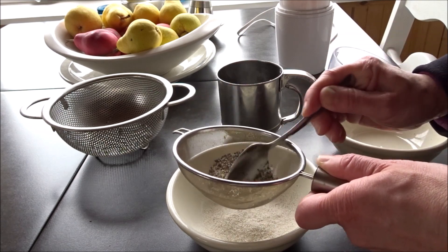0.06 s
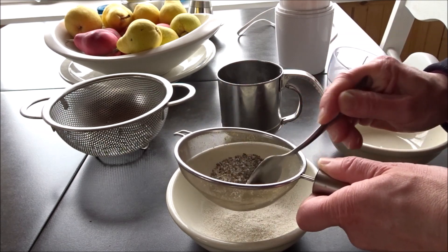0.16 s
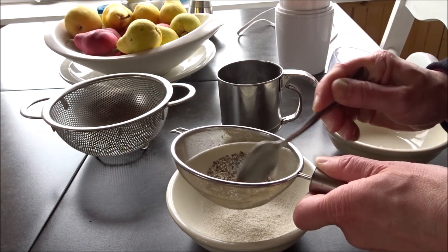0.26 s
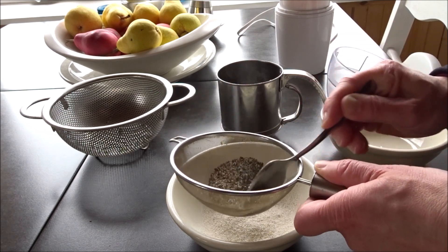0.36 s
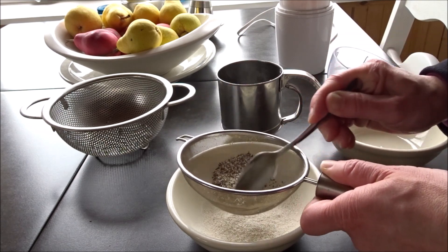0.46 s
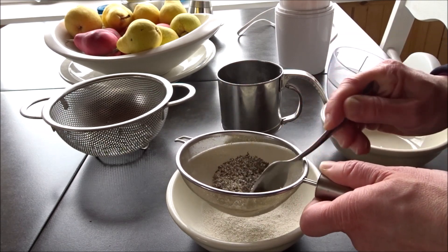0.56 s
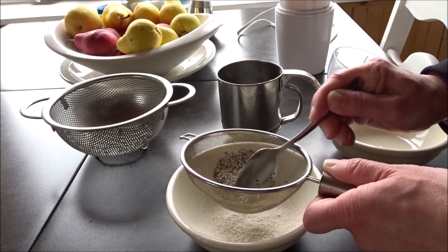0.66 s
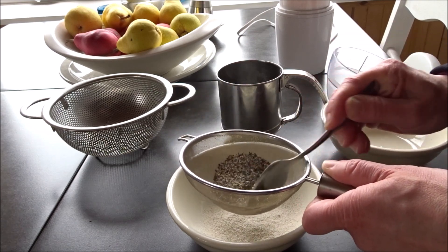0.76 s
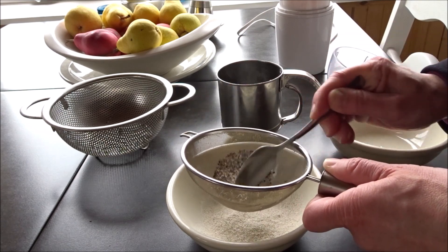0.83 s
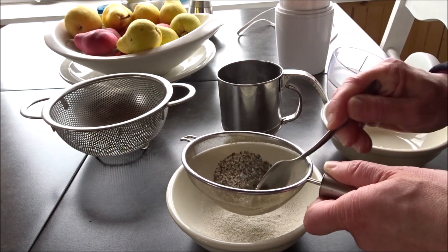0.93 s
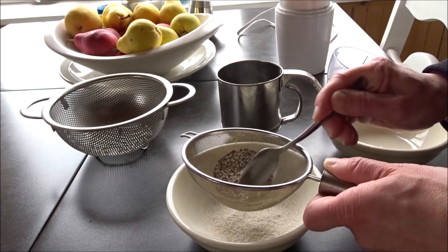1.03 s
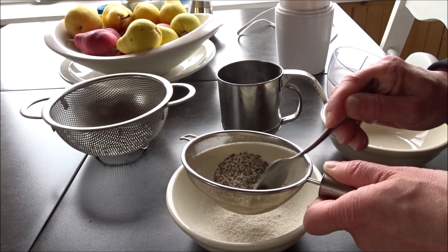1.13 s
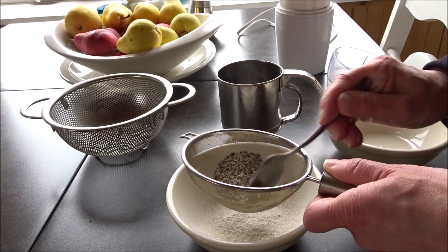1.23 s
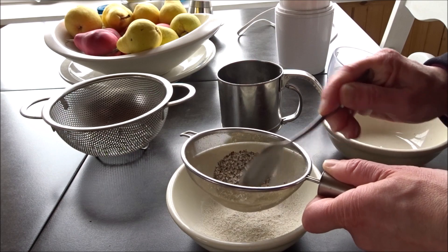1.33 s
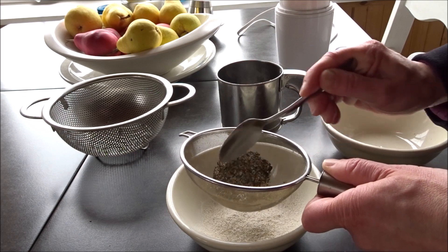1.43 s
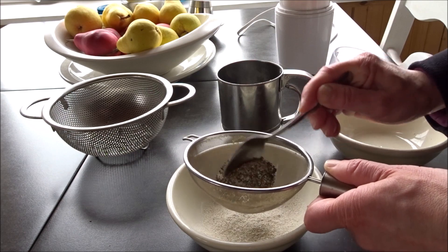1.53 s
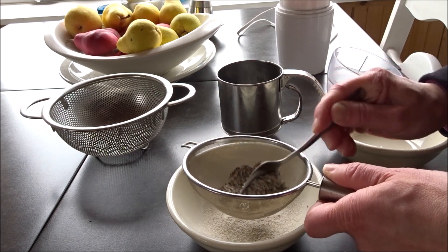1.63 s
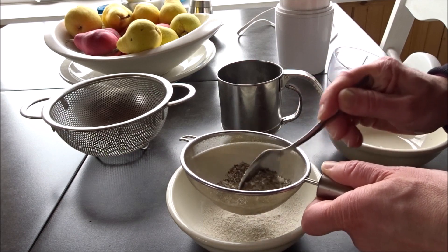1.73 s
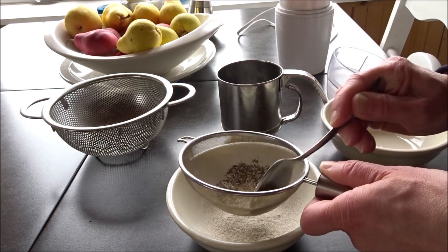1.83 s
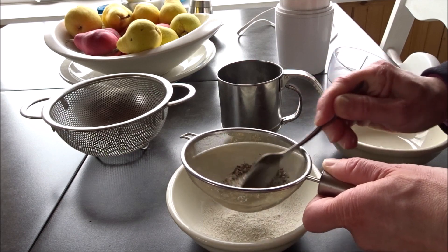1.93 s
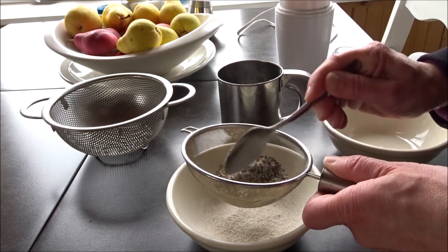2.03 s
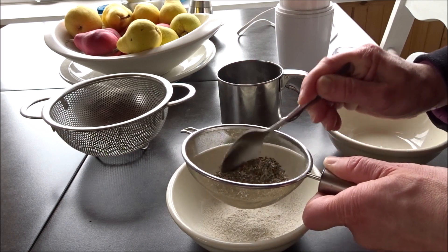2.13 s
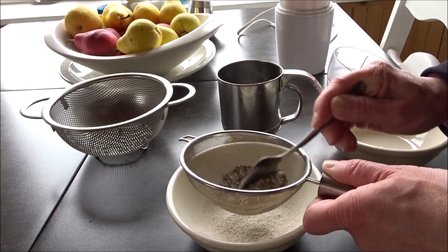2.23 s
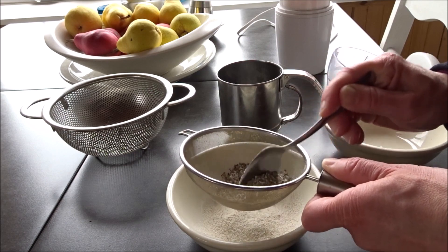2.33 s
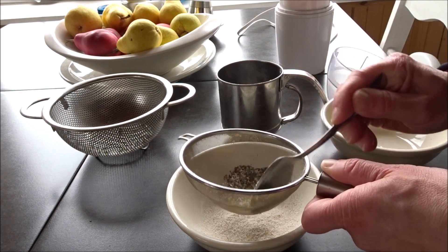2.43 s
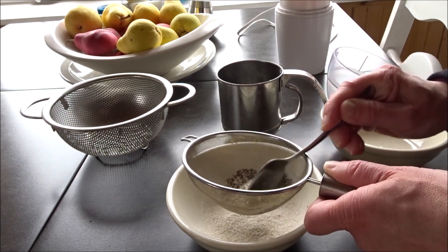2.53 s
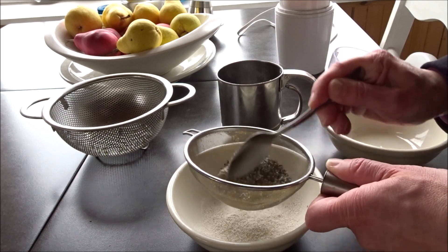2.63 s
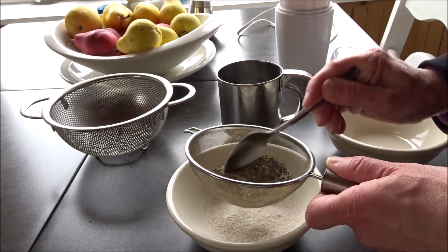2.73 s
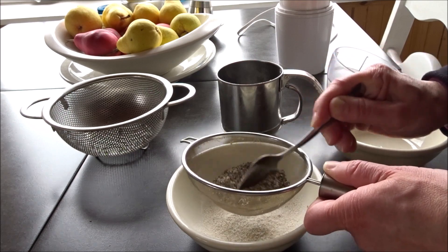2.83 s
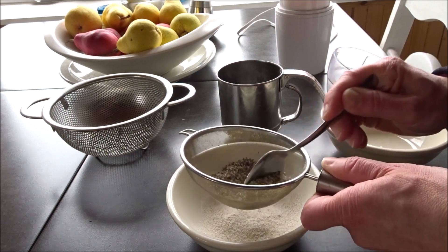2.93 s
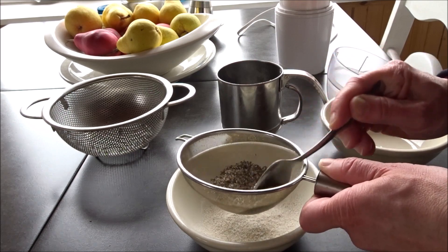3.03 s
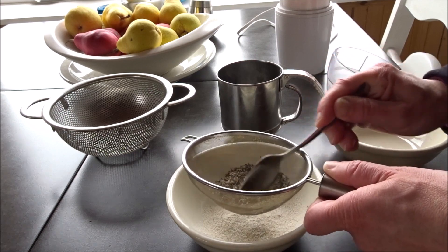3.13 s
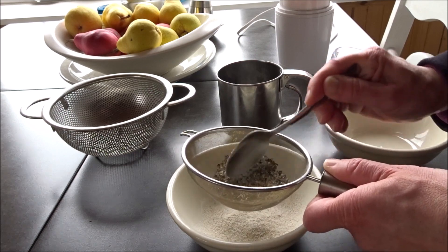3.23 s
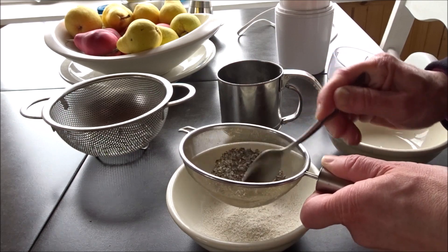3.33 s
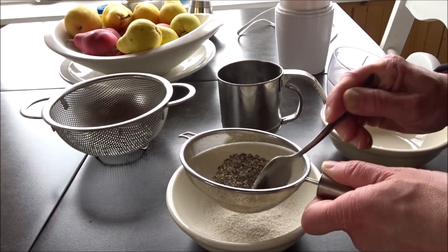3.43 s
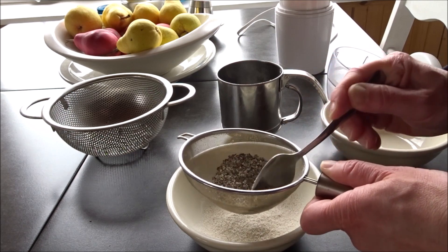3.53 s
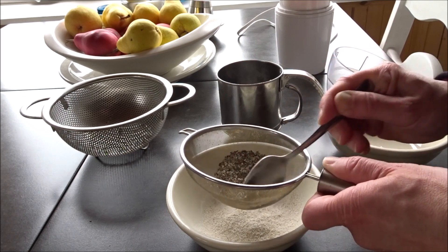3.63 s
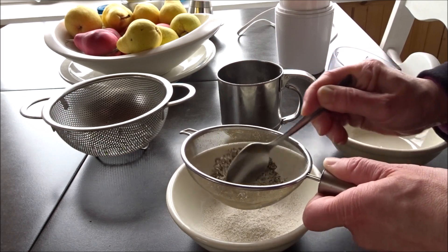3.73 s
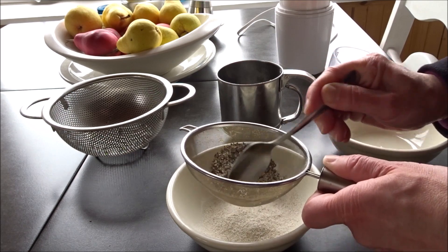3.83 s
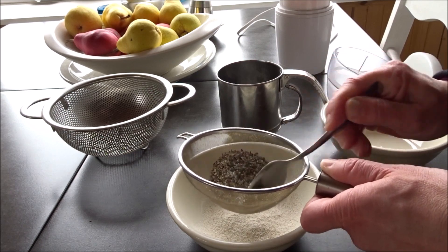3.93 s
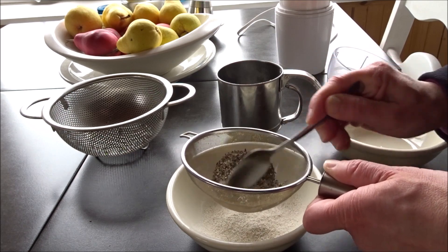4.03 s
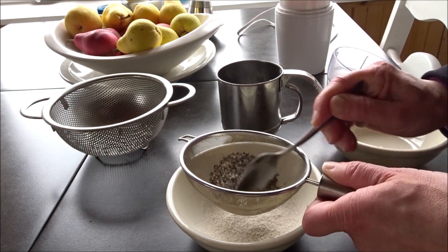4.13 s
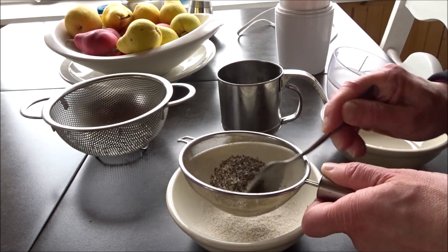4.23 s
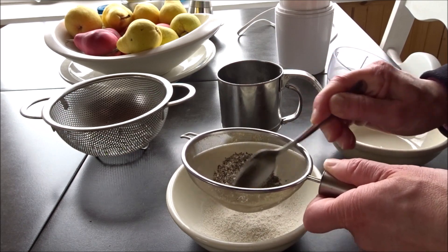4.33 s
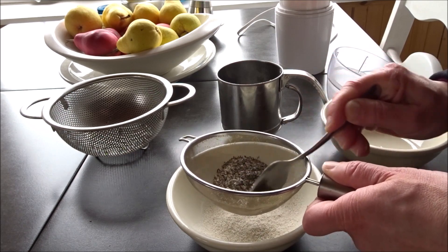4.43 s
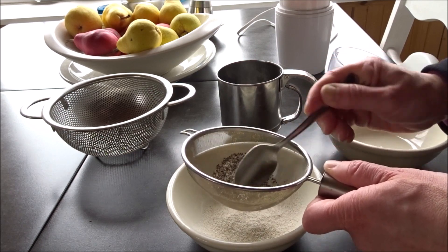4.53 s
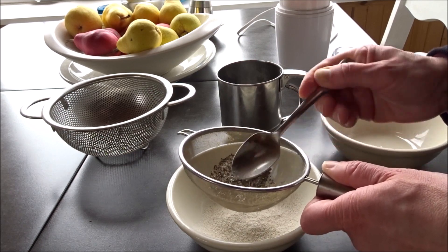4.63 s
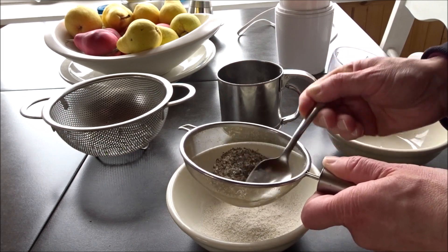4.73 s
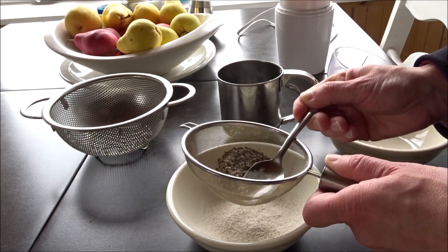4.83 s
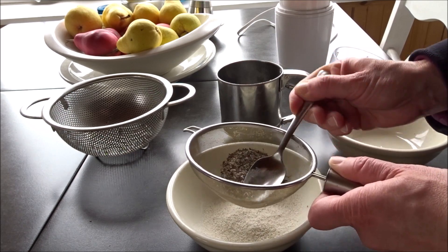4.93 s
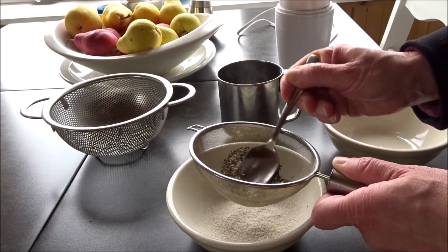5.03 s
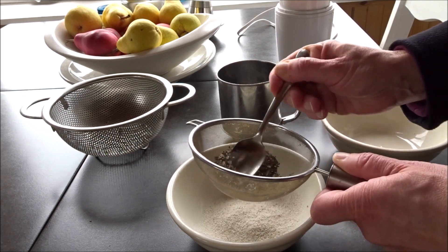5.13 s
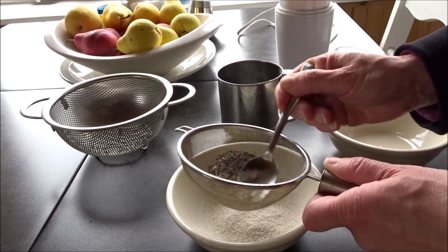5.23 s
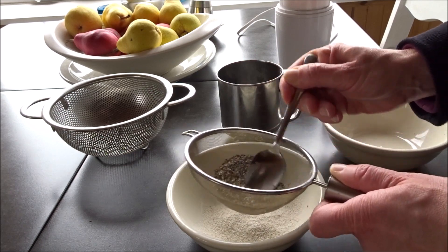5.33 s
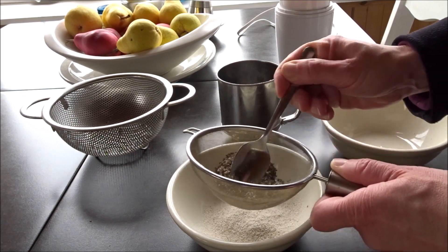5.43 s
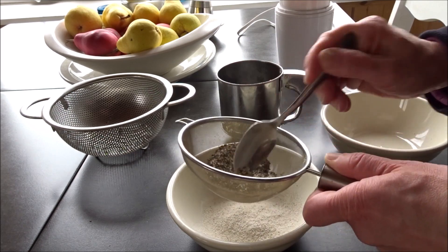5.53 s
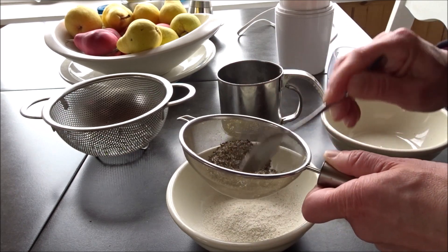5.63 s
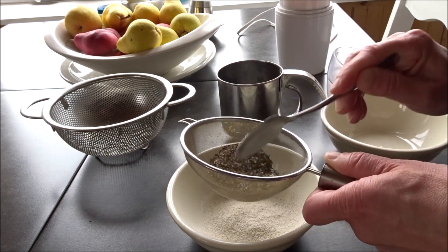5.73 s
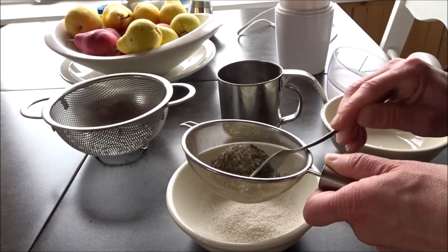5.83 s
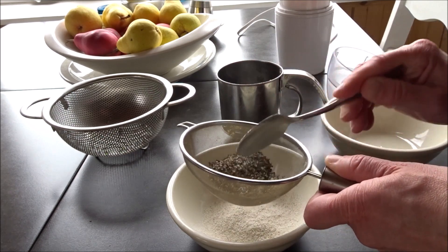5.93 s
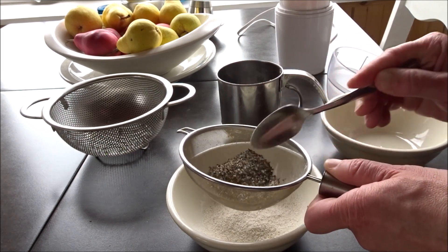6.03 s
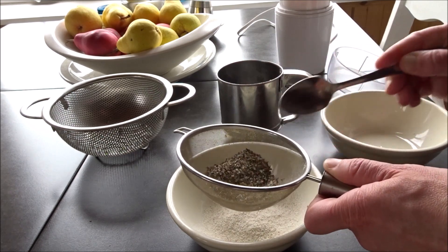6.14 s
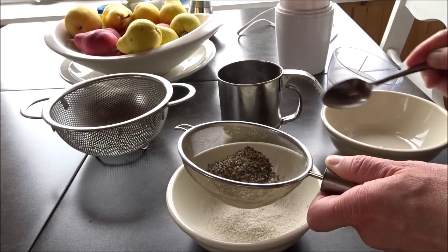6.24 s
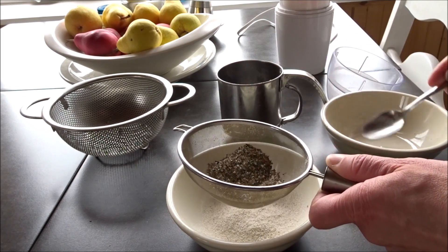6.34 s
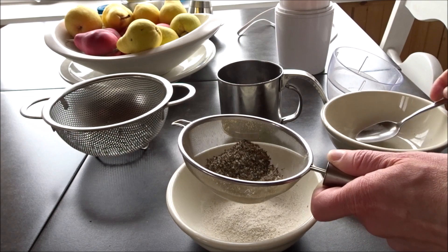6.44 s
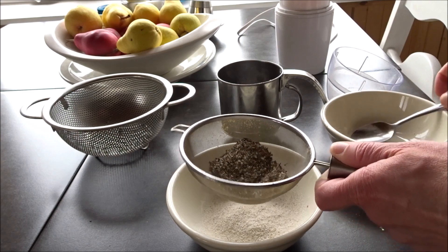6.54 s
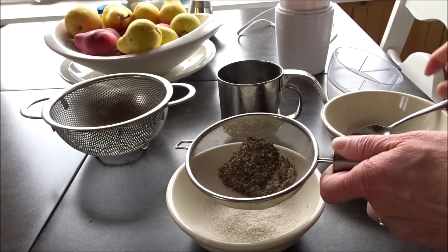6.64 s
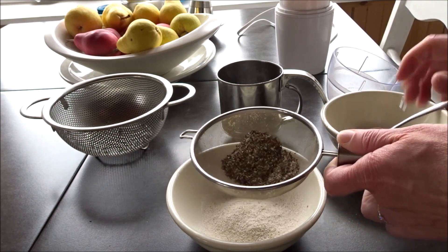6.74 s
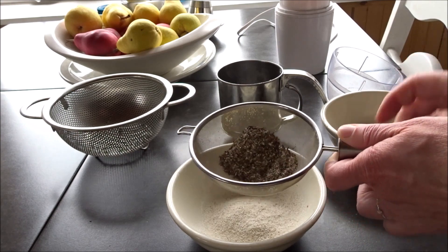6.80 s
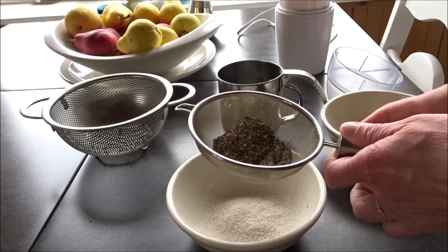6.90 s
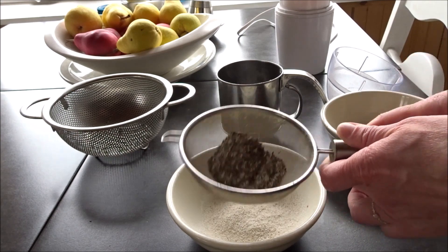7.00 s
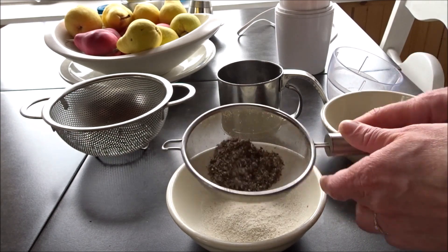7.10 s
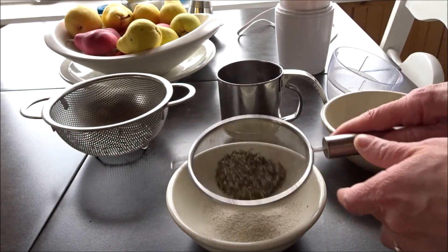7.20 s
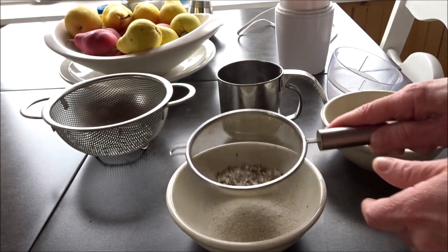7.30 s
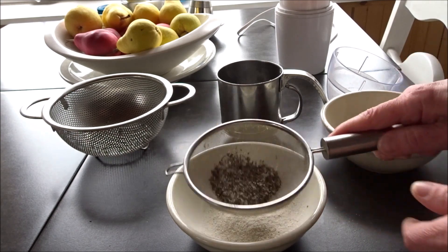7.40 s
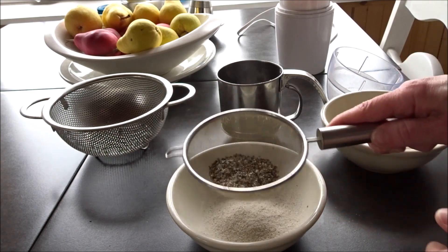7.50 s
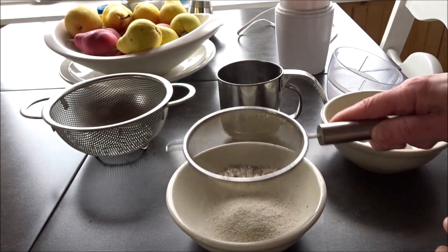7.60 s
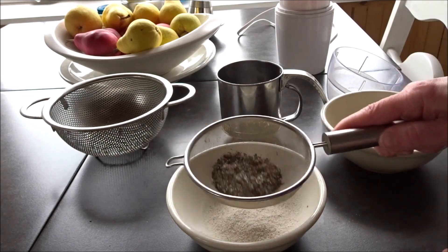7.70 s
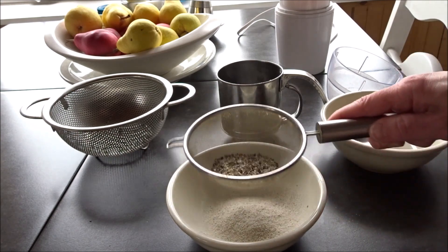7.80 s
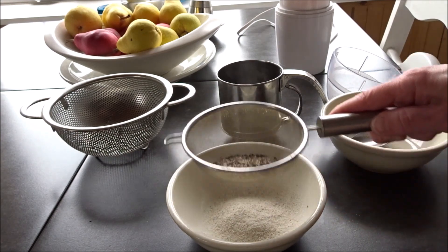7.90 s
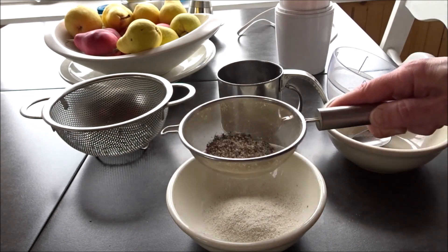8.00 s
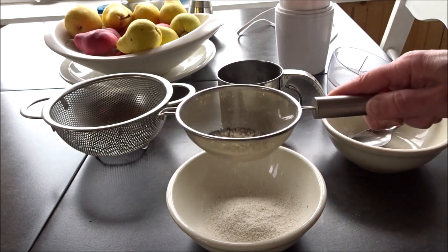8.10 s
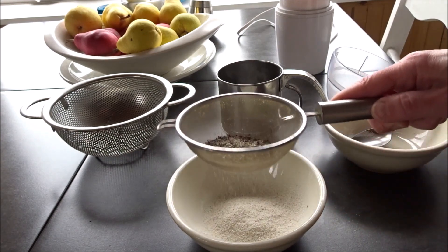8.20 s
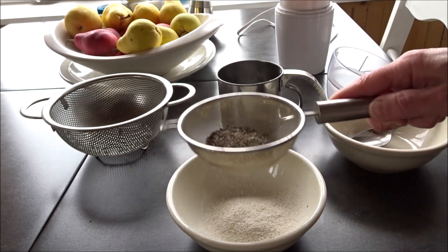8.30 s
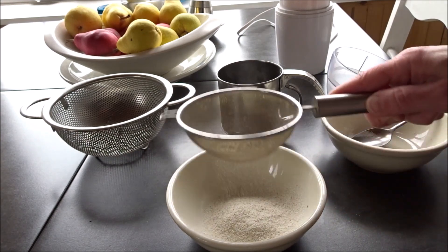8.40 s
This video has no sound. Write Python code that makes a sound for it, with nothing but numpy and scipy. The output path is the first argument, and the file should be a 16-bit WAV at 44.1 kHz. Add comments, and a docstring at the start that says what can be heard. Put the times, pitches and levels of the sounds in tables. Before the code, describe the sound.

Short, gritty scrapes and slower sweeps of a metal spoon in a wire sieve sound a little to the right, dotted with tiny ticks. A few knocks on the rim follow, then the loudest moment: the spoon clinks and rattles into a china bowl. A barely audible shake of the sieve ends it. The kitchen is small and hard-walled, with distant traffic and a faint engine beyond it.

```python
"""A small hard kitchen, far traffic murmuring outside; the work is a little right of a stereo microphone.
A steel spoon rubs flour through a fine mesh sieve in quick strokes, plucking wire after wire and
snagging now and then. It is tapped off on the rim and laid in a china bowl, where it chatters and
rings, while a distant engine pulls through two gears. Last, the sieve is shaken softly."""
import sys
import numpy as np
from scipy import signal
from scipy.fft import rfft, irfft, next_fast_len
from scipy.io import wavfile
from scipy.ndimage import uniform_filter1d, minimum_filter1d, map_coordinates

SR = 44100
rng = np.random.default_rng(int(sys.argv[2]) if len(sys.argv) > 2 else 0)


def unload_wav(signal):
    """Save mono or channel-first audio to the path in sys.argv[1] as 16-bit WAV at rate SR, clipped to [-1, 1]."""
    wavfile.write(
        sys.argv[1],
        SR,
        np.round(np.clip(np.atleast_2d(signal).T, -1, 1) * 32767).astype(np.int16),
    )


N = 373150
TIME = np.arange(N) / SR

# spectrum of steel scraping wire: frequency_hz, level_db
RASP = [(300, -28.5), (700, -11.5), (1300, -5.5), (2000, -3), (3000, -2), (4500, -4.5), (6000, 1),
        (7500, 2), (9300, 1.5), (11000, 0.5)]


def amp(db):
    return 10 ** (np.asarray(db) / 20)


def unit(x):
    return x / np.sqrt(np.mean(x ** 2) + 1e-20)


def fade(t, t60):
    """Exponential decay by 60 dB in t60 seconds."""
    return np.exp(-np.log(1000) * t / t60)


def swell(t, rise, fall):
    """A rounded rise to 1 at t = 0, then a rounded fall."""
    return np.exp(-(t / np.where(t < 0, rise, fall)) ** 2)


def along(points, hz):
    """Read a curve of (frequency_hz, value) points on a log frequency axis."""
    f, values = np.transpose(points)
    return np.interp(np.log(hz + 1), np.log(f + 1), values)


def add(track, start_s, sound):
    """Mix a sound into a track from start_s on."""
    start = round(start_s * SR)
    sound, start = sound[..., max(-start, 0):], max(start, 0)
    track[..., start:start + sound.shape[-1]] += sound[..., :N - start]


def filtered(x, response):
    """Pass x through a complex response, given as a function of frequency."""
    size = x.shape[-1]
    padded = next_fast_len(size + SR // 10)
    return irfft(rfft(x, padded) * response(np.fft.rfftfreq(padded, 1 / SR)), padded)[..., :size]


def resonance(f, hz, width):
    """Causal response of one mode, 1 at its centre."""
    return 1j * f * width / (hz * hz - f * f + 1j * f * width)


def resonances(f, modes):
    """Summed response of modes listed as pitch_hz, width_hz, level_db."""
    return sum(amp(db) * resonance(f, hz, width) for hz, width, db in modes)


def without_bass(x, corner_hz):
    """Small objects radiate little below their corner frequency."""
    return signal.sosfilt(signal.butter(3, corner_hz, "highpass", fs=SR, output="sos"), x)


def noise(spectrum, size):
    """Coloured noise of rms 1."""
    return unit(filtered(rng.standard_normal(size), lambda f: amp(along(spectrum, f))))


def stereo_noise(spectrum, side_db):
    """Coloured noise, partly alike at both microphones."""
    mid, side = noise(spectrum, N), amp(side_db) * noise(spectrum, N)
    return np.array([mid + side, mid - side])


def grains(size, per_s, spread_db):
    """Tiny impacts at random moments and of random strength."""
    hit = rng.random(size) < per_s / SR
    return hit * rng.standard_normal(size) * amp(spread_db * rng.standard_normal(size))


def placed(x, pan_db):
    """A source to one side of the microphones; pan_db is left over right."""
    return x * amp(np.array([[.5], [-.5]]) * pan_db)


def on_table(x, scatter_db, t60):
    """Quick reflections from table and dishes, different at each spot and each microphone."""
    t = np.arange(SR // 40) / SR
    scatter = unit(rng.standard_normal((2, len(t))) * fade(t, t60)) / np.sqrt(len(t))
    return x + amp(scatter_db) * signal.fftconvolve(x, scatter, axes=1)[:, :x.shape[1]]


def kitchen(x, room_db):
    """Direct sound and the room's tail, whose treble dies first."""
    # reverberation time of the room: frequency_hz, t60_s
    decay = [(200, .5), (1000, 0.54), (3000, 0.49), (6000, 0.47), (11000, 0.36)]
    # stereo width, the bass alike at both microphones: frequency_hz, side_over_mid_db
    width = [(300, -14), (1200, -12.5), (3000, -3.5), (8000, 4.5)]
    t = np.arange(SR // 2) / SR
    hz, frame_s, spectra = signal.stft(rng.standard_normal((2, len(t))), SR, nperseg=256)
    side_gain = amp(along(width, hz))[:, None]
    mid, side = spectra[0], spectra[1] * side_gain
    diffuse = np.array([mid + side, mid - side]) / np.hypot(1, side_gain)
    dying = diffuse * fade(frame_s, along(decay, hz)[:, None])
    tail = signal.istft(dying, SR, nperseg=256)[1][:, :len(t)]
    build_up = 1 - np.exp(-(t / 0.0062) ** 2)
    tail = unit(tail * build_up) / np.sqrt(len(t))
    return x + amp(room_db) * signal.fftconvolve(x, tail, axes=1)[:, :x.shape[1]]


def far_traffic():
    """The road heard from indoors: a steady muffled rumble, and tyres that come and go."""
    # spectrum of the rumble: frequency_hz, level_db
    murmur = [(30, -44), (65, -35.5), (90, -35), (120, -16.5), (170, -18), (260, -6.5), (450, -1.5),
              (620, -1.5), (800, 1), (1050, -1), (1500, -10), (2500, -14), (4000, -19.5), (8000, -24.5)]
    # narrow bands that stand out of it: pitch_hz, width_hz, level_db
    drone = [(118, 8, -9), (281, 18, 2.5), (440.7, 19, 7), (1000, 60, -8.5)]
    # spectrum of tyres on the road: frequency_hz, level_db
    tyre_spectrum = [(300, -29), (800, -7.5), (1300, -2.5), (2200, -6.5), (3500, -10.5), (7000, -15.5)]
    # tyre noise as cars pass: time_s, level_db
    passing = [(0, -65), (3.5, -66.5), (6.3, -67.5), (7.1, -65.5), (7.6, -69), (7.85, -65.5), (8.46, -69)]
    rumble = unit(filtered(stereo_noise(murmur, side_db=-13.5), lambda f: 1 + resonances(f, drone)))
    tyre_db = np.interp(TIME, *np.transpose(passing))
    return amp(-63.5) * rumble + amp(tyre_db) * stereo_noise(tyre_spectrum, side_db=0.5)


def hiss(level_db=-72):
    """A thin steady hiss, independent in each channel."""
    # colour of the hiss: frequency_hz, level_db
    spectrum = [(300, -4), (2500, 0), (4000, -1), (7000, -2.5), (11000, -3.5)]
    return amp(level_db) * np.array([noise(spectrum, N), noise(spectrum, N)])


def sieve_body(f, broad_db=-5.5, low_hz=900):
    """Broad wire rasp with the modes of rim and spoon on top; the open mesh radiates little bass."""
    # modes of sieve and spoon under friction: pitch_hz, width_hz, level_db
    modes = [(1295, 275, 0.5), (2290, 160, -3.5), (3290, 243, 3), (3765, 97, -2), (4570, 310, 6),
             (4970, 66, 1), (5560, 370, -3.5), (6240, 150, -13), (7130, 36, -0.5), (8370, 250, 5.5),
             (10060, 260, -4)]
    bass_loss = f ** 2 / (f ** 2 + low_hz ** 2)
    return amp(along(RASP, f)) * (amp(broad_db) + resonances(f, modes)) * bass_loss


def rub(peak_s, rise_s, fall_s, tilt_db_per_oct, plucks_per_s, slip_db, slips_per_s=220):
    """The spoon's edge plucks wire after wire, in stick-slip spurts under a swell of pressure."""
    t = np.arange(int(2 * peak_s * SR)) / SR
    sliding_flour = amp(-22.5) * swell(t - peak_s, 2 * rise_s, 0.082)
    pressure = swell(t - peak_s, rise_s, fall_s) + sliding_flour
    grip = np.clip(rng.standard_normal(len(t)), -2, 2)
    slips = amp(slip_db * map_coordinates(grip, [t * slips_per_s], order=1))
    plucks = unit(slips * grains(len(t), plucks_per_s, spread_db=2.0))
    # the patch of mesh under the spoon has its own resonance, new at each stroke
    patch_hz = 3880 * 2 ** (0.47 * rng.standard_normal())

    def colour(f):
        tilt = amp(tilt_db_per_oct * np.log2((f + 100) / 4500))
        patch = 1 + amp(-4) * resonance(f, patch_hz, width=570)
        return sieve_body(f) * tilt * patch

    steady, stroke = filtered(np.array([plucks, plucks * pressure]), colour)
    return on_table(placed(stroke / np.std(steady), pan_db=-4.0), scatter_db=-4.5, t60=0.021)


def strokes(lead_s=.2):
    """Quick pushes and pulls, and slower sweeps, all rub the same mesh."""
    # the spoon is pushed away, swelling against the mesh: peak_s, level_db
    pushes = [(0.077, -47), (0.154, -46), (0.352, -58.5), (0.66, -42.5), (0.853, -44.5), (1.048, -45.5),
              (1.214, -47.5), (4.077, -45.5), (4.319, -42), (4.511, -44.5)]
    # it is drawn back, biting at once and easing off: peak_s, level_db
    pulls = [(0.409, -51.5), (0.44, -51), (0.515, -48), (0.727, -44.5), (0.908, -46), (1.087, -45),
             (1.258, -49), (1.648, -53), (2.547, -51), (4.17, -46), (4.386, -44.5), (4.482, -58),
             (5.22, -56.5)]
    # it sweeps round the bowl of the sieve: peak_s, level_db, half_length_s
    sweeps = [(1.591, -54, 0.039), (1.953, -53, 0.047), (2.264, -48, 0.039), (2.572, -57, 0.087),
              (2.873, -53, 0.05), (3.155, -52, 0.07), (3.411, -63, .06), (3.739, -50, 0.061),
              (3.926, -54, 0.054), (4.081, -58.5, 0.069), (4.851, -61.5, 0.084), (4.983, -60.5, 0.094),
              (5.355, -61, .075)]
    quick = dict(plucks_per_s=12000, slip_db=2.5)  # crosses many wires evenly
    slow = dict(plucks_per_s=4000, slip_db=4)  # sticks and slips, so it is grittier
    out = np.zeros((2, N))
    for peak_s, db in pushes:
        push = rub(lead_s, rise_s=0.028, fall_s=0.017, tilt_db_per_oct=-4, **quick)
        add(out, peak_s - lead_s, amp(db) * push)
    for peak_s, db in pulls:
        pull = rub(lead_s, rise_s=0.0052, fall_s=0.047, tilt_db_per_oct=-3.5, **quick)
        add(out, peak_s - lead_s, amp(db) * pull)
    for peak_s, db, half_s in sweeps:
        sweep = rub(lead_s, rise_s=half_s, fall_s=half_s, tilt_db_per_oct=-4, **slow)
        add(out, peak_s - lead_s, amp(db) * sweep)
    return out


def tick(modes, t60, soft_hz, low_hz):
    """A dry tick on the sieve with a short ring, its top softened by the flour."""
    def colour(f):
        return amp(along(RASP, f)) * (1 + resonances(f, modes)) / np.sqrt(1 + (f / soft_hz) ** 4)

    t = np.arange(SR // 10) / SR
    attack = 1 - np.exp(-t / 0.00059)
    burst = rng.standard_normal(len(t)) * fade(t, t60) * attack
    sound = without_bass(filtered(burst, colour), corner_hz=low_hz)
    return on_table(placed(sound / np.abs(sound).max(), pan_db=-4.0), scatter_db=-8, t60=0.0029)


def snags(ring_hz=5350, spread_oct=0.22, ring_width_hz=200, ring_db=9):
    """Single wires catch the spoon and spring free, each ringing at a pitch of its own."""
    # a wire catches the spoon's edge: start_s, level_db
    catches = [(0.132, -35), (0.62, -37), (0.634, -37), (0.409, -40), (0.6764, -29), (1.6506, -31.5),
               (1.9393, -33), (1.9557, -30), (2.2355, -32), (2.2712, -32), (2.5459, -30), (2.582, -28),
               (2.8588, -29), (3.0986, -33.5), (3.6468, -35), (3.781, -39), (3.897, -34.5), (4.2282, -28),
               (4.291, -35), (4.4528, -35.5), (4.48, -42)]
    pitches_hz = ring_hz * 2 ** (spread_oct * rng.standard_normal(len(catches)))
    out = np.zeros((2, N))
    for (start_s, db), hz in zip(catches, pitches_hz):
        wire = (hz, ring_width_hz, ring_db)
        add(out, start_s, amp(db - 1) * tick([wire], t60=0.012, soft_hz=9400, low_hz=1000))
    return out


def zings(pitch_hz=5620, width_hz=280):
    """Fast skids over the wires drive one narrow resonance of the spoon."""
    # the spoon's edge skids and sings briefly: peak_s, level_db
    skids = [(0.415, -46), (0.444, -46.5), (0.64, -48), (2.556, -51), (3.132, -51), (4.485, -51)]
    out, t = np.zeros((2, N)), np.arange(-SR // 20, SR // 10) / SR
    for peak_s, db in skids:
        plucks = grains(len(t), per_s=12000, spread_db=6.5)
        song = unit(filtered(plucks, lambda f: resonance(f, pitch_hz, width_hz) ** 2))
        zing = song * swell(t, rise=0.01, fall=0.013)
        add(out, peak_s + t[0], amp(db) * placed(zing, pan_db=-5.0))
    return out


def taps():
    """The spoon knocks on the sieve's rim to shed its flour."""
    # knocks on the rim: start_s, level_db
    knocks = [(4.8352, -26), (4.8564, -34.5), (4.936, -40), (4.940, -32.5), (5.468, -35.5), (5.845, -42.5),
              (5.8686, -19)]
    # modes of the rim: pitch_hz, width_hz, level_db
    rim = [(2830, 120, 11.5), (5260, 500, 1.5), (6560, 90, -1), (8520, 87, 2)]
    out = np.zeros((2, N))
    for start_s, db in knocks:
        add(out, start_s, amp(db - 1) * tick(rim, t60=0.0077, soft_hz=6200, low_hz=750))
    return out


def far_engine(climb_hz_per_s=14.5, let_off_s=0.23):
    """In each gear an unsteady exhaust note climbs and a muffled roar swells until the throttle closes."""
    # the pull through two gears: full_load_s, firing_hz at full load, level_db, rise_s
    gears = [(6.02, 66.6, -74.5, 0.83), (7.6, 63, -72.5, 0.39)]
    # exhaust note: harmonic_number, level_db
    harmonics = [(1, -20), (2, -8.5), (3, -4), (4, 2), (7, 3.5), (8, 2)]
    # spectrum of the engine under load: frequency_hz, level_db
    roar_spectrum = [(100, -22), (200, -12), (330, -5), (420, -6), (520, 4), (590, 0), (680, -17.5),
                     (1500, -44.5)]
    out = np.zeros((2, N))
    roar = amp(9) * stereo_noise(roar_spectrum, side_db=-14.5)
    unsteady = 1 + 0.039 * map_coordinates(rng.standard_normal(N // 100), [TIME * 14], order=1)
    for full_load_s, firing_hz, db, rise_s in gears:
        t = TIME - full_load_s
        firings = np.cumsum((firing_hz + climb_hz_per_s * t) * unsteady) / SR
        exhaust = sum(amp(level) * np.sin(2 * np.pi * k * firings) for k, level in harmonics)
        out += amp(db) * swell(t, rise_s, let_off_s) * (exhaust + roar)
    return placed(out, pan_db=-1.85)


def ringing(modes, t, scatter_db):
    """One decaying sine for each mode, struck at a new strength."""
    hz, db, t60 = np.transpose(modes)[:3, :, None]
    strength = amp(db + scatter_db * rng.standard_normal(db.shape))
    return strength * fade(t, t60) * np.sin(2 * np.pi * (hz * t + rng.random(db.shape)))


def crack(t, t60, rattle_db, rattle_t60):
    """A hard contact: a brief snap and the quickly damped knock of bowl and table."""
    # spectrum of steel striking china: frequency_hz, level_db
    spectrum = [(150, -23), (350, -8.5), (600, -5.5), (1100, 2), (2200, 2.5), (3100, 2), (4500, 2),
                (7000, -3), (9500, 2), (11000, 0.5)]
    return noise(spectrum, len(t)) * (fade(t, t60) + amp(rattle_db) * fade(t, rattle_t60))


def laying_down(ring_db=-5, crack_db=-3.5):
    """Still held, the spoon touches the bowl and bounces."""
    # first touch and bounces: start_s, level_db
    touches = [(6.400, -18), (6.402, -18), (6.417, -20.5), (6.426, -30), (6.436, -22), (6.462, -31),
               (6.485, -33)]
    # modes of the held spoon against the bowl: pitch_hz, level_db, t60_s
    spoon = [(600, -28, .15), (720, -26, .12), (1082, -24, .12), (1450, -19, .1), (1680, -20, .1),
             (2080, -19, .12), (2300, -17.5, .15), (2850, -24, .07), (3750, -21, .06), (4420, -20, .08),
             (4560, -22, .06), (5070, -18, .1), (5850, -23, .07), (6280, -22, .07), (7300, -19, .05),
             (8236, -19, .12), (8860, -21, .08), (9480, -22, .07), (10320, -11, .1), (10870, -14, .12)]
    out, t = np.zeros((2, N)), np.arange(2 * SR // 3) / SR
    for start_s, db in touches:
        ring = amp(ring_db) * ringing(spoon, t, scatter_db=1.5).sum(0)
        snap = amp(crack_db) * crack(t, t60=0.0038, rattle_db=-17.5, rattle_t60=0.25)
        hit = placed(amp(db) * (ring + snap), pan_db=-1.5)
        add(out, start_s, kitchen(on_table(hit, scatter_db=-3.5, t60=0.011), room_db=1))
    return without_bass(out, corner_hz=420)


def chatter(ring_db=-11.5, crack_db=-4.0, favour_db=14.5, favour_oct=0.42):
    """Let go, the handle chatters on the bowl; each point of contact favours other modes."""
    # the handle strikes the bowl's rim: start_s, level_db, favoured_hz
    contacts = [(6.572, -16.5, 5600), (6.596, -18, 3500), (6.611, -28, 5000), (6.623, -17, 6400),
                (6.641, -22.5, 3500), (6.654, -15.5, 7000), (6.675, -20, 3500), (6.692, -26, 8000),
                (6.701, -21, 5600), (6.713, -31, 6000), (6.722, -22, 3500), (6.734, -31, 3400),
                (6.767, -42, 3500)]
    # modes of bowl and free spoon: pitch_hz, level_db, t60_s, pan_db
    bowl = [(1701, 1.5, .24, -3.5), (1740, -12, .2, -3), (3488, -1, .2, -1.5), (3532, -10, .14, -3),
            (3591, -13, .15, -4), (4883, -15, .18, -6), (5067, -7, .1, -5), (5748, -4.5, .14, -8),
            (5772, -6.5, .15, -8), (6322, -15, .17, -6), (6373, -16, .17, -6), (6813, -21, .2, -6),
            (8485, 0, .11, -3), (8597, 1, .1, -6), (8637, -8, .11, -4), (8683, -6, .11, -2),
            (10455, -3, .11, -4), (10797, -5, .12, -1)]
    mode_hz, _, _, mode_pan_db = np.transpose(bowl)
    out, t = np.zeros((2, N)), np.arange(2 * SR // 3) / SR
    for start_s, db, favoured_hz in contacts:
        weights = amp(favour_db * swell(np.log2(mode_hz / favoured_hz), favour_oct, favour_oct))
        ring = kitchen(placed(weights, mode_pan_db) @ ringing(bowl, t, scatter_db=1), room_db=-6)
        snap = placed(crack(t, t60=.015, rattle_db=-8.5, rattle_t60=.13), pan_db=0.5)
        knock = kitchen(on_table(snap, scatter_db=-3.5, t60=0.018), room_db=-3)
        add(out, start_s, amp(db) * (amp(ring_db) * ring + amp(crack_db) * knock))
    return without_bass(out, corner_hz=404)


def shaking(swing_hz=8.5, swing_db=4, attack_s=.08, release_s=0.28):
    """Dry bran slides to and fro over the mesh."""
    # the sieve is shaken, then lifted: start_s, hold_s, level_db
    shakes = [(7.281, 0.36, -75.5), (8.422, .05, -77.5)]
    swing = amp(swing_db * np.sin(2 * np.pi * swing_hz * TIME))
    bran = unit(filtered(grains(N, per_s=900, spread_db=4), sieve_body))
    effort = np.zeros(N)
    for start_s, hold_s, db in shakes:
        outside_hold_s = TIME - np.clip(TIME, start_s, start_s + hold_s)
        effort += amp(db) * swell(outside_hold_s, attack_s, release_s)
    return effort * swing * placed(bran, pan_db=-4)


def scene(lag_s=.00002):
    """The work is a little to the right, so it reaches the left microphone later; the road is far off."""
    rubbing = kitchen(strokes() + zings() + shaking(), room_db=-12.0)
    ticking = kitchen(snags() + taps(), room_db=-7.5)
    work = rubbing + ticking + laying_down() + chatter()
    at_microphones = filtered(work, lambda f: np.exp(np.array([[-1j], [1j]]) * np.pi * f * lag_s))
    outside = placed(far_traffic(), pan_db=-1.85) + far_engine()
    return at_microphones + outside + hiss()


def limited(x, ceiling_db, hold_s):
    """Gain drops just before a peak above the ceiling and recovers soon after."""
    size = int(hold_s * SR)
    needed_gain = np.minimum(1, amp(ceiling_db) / (np.abs(x).max(0) + 1e-9))
    return x * uniform_filter1d(minimum_filter1d(needed_gain, 2 * size + 1), size)


def record(dry, top_hz=11020):
    """The recorder holds down the loudest peaks and cuts off steeply above its band limit."""
    held = limited(dry, ceiling_db=-6.5, hold_s=.004)
    return filtered(held, lambda f: 1 / np.sqrt(1 + np.minimum(f / top_hz, 1.2) ** 400))


dry = scene()
out = record(dry)
unload_wav(out)
```